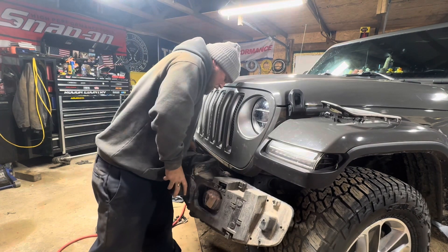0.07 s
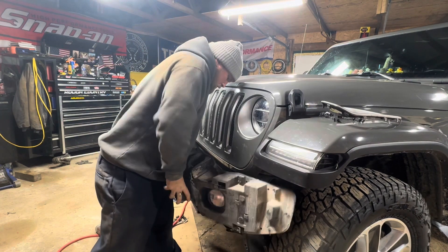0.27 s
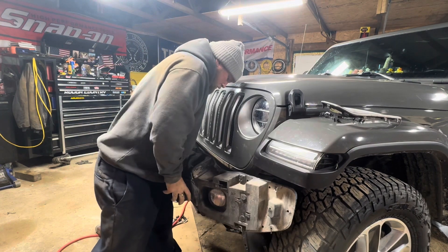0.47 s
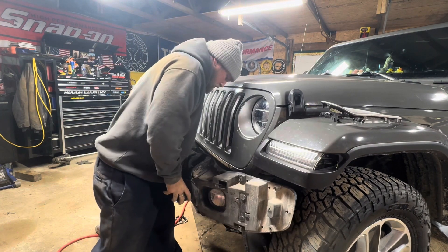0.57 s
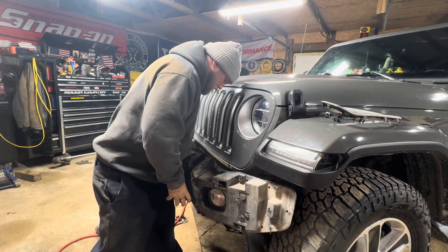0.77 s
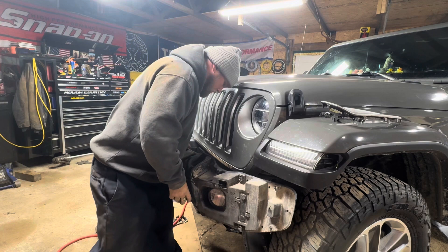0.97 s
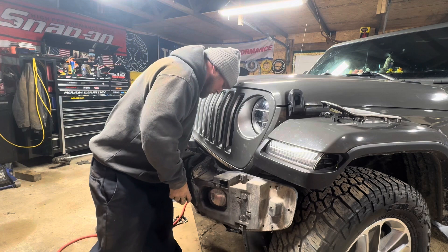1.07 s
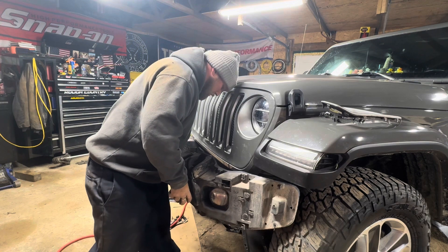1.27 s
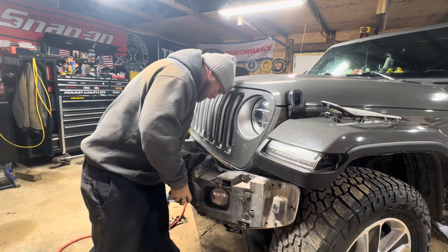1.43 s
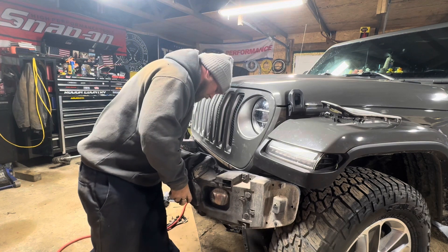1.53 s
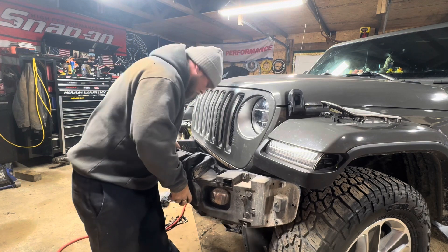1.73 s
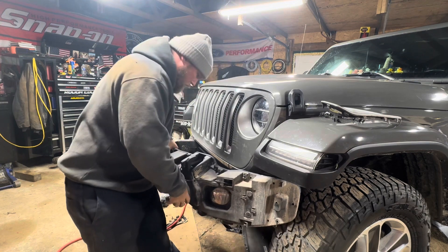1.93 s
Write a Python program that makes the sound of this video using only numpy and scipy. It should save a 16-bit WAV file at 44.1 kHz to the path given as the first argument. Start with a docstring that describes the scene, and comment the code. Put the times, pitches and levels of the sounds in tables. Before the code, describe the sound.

A loose metal and plastic vehicle bumper grinds softly over low rumble, then a tiny sharp squeak at 0.2 s leads into a loud, crunching cluster of bangs until 0.33. A dull knock and low groan come at 0.55, bright plastic snaps and crackles at 0.73-0.9, faint scrapes and taps around 1.0-1.15. After a lull, hissing hollow slide and knocks burst at 1.67 and 1.74, ringing through the garage.

```python
"""In a garage, a loose steel and plastic bumper is tugged by hand while the car's frame rumbles.
It grinds, groans and squeaks, then bangs against its mounts; a plastic part snaps and crackles close by.
A hissing slide with a hollow tone and two more bursts of knocks follow, and the garage rings on.
Blows and slips drive a ringing shell, friction tones are unsteady sines, snaps and hisses are shaped noise."""
import sys
import numpy as np
from scipy import signal
from scipy.fft import rfft, irfft
from scipy.io import wavfile

SR = 44100
rng = np.random.default_rng(int(sys.argv[2]) if len(sys.argv) > 2 else 0)


def master_out(mix):
    """Clip the mix to full scale and print it as 16-bit PCM to the path in sys.argv[1]."""
    frames = np.transpose(np.atleast_2d(mix))
    ceiling = np.clip(frames, -1, 1)
    pcm = np.round(ceiling * 32767).astype(np.int16)
    wavfile.write(sys.argv[1], SR, pcm)


N = 88200
T = np.arange(N) / SR


def from_db(db):
    """Decibels to gain."""
    return 10 ** (np.asarray(db) / 20)


def unit(x):
    """Scale to energy 1."""
    return x / np.sqrt(np.sum(x ** 2) + 1e-20)


def rms_one(x):
    """Scale to rms 1."""
    return unit(x) * np.sqrt(len(x))


def at_hz(points, hz):
    """Read a table on a log-frequency axis."""
    f, v = np.transpose(points)
    return np.interp(np.log(np.maximum(hz, 1)), np.log(f), v)


def in_time(rows):
    """Read the columns of a curve at every sample."""
    s, *columns = np.transpose(rows)
    return [np.interp(T, s, column) for column in columns]


def swell(s, rise, fall):
    """A bell-shaped stroke that peaks at a time, with its own rise and fall in seconds."""
    width = np.where(T < s, rise, fall)
    return np.exp(-((T - s) / width) ** 2)


def add(out, s, x):
    """Mix a sound in at a time."""
    start = int(max(s, 0) * SR)
    out[start:start + len(x)] += x[:N - start]


def through(x, response):
    """Play a sound through an impulse response."""
    return signal.fftconvolve(x, response)[:N]


def cut(x, hz, kind, order=2):
    """Butterworth filter."""
    corners = np.clip(hz, 10, .45 * SR)
    sos = signal.butter(order, corners, kind, fs=SR, output="sos")
    return signal.sosfilt(sos, x + 1e-18)


def colour(x, spectrum):
    """Causal (minimum-phase) filter that follows a spectrum."""
    gain = from_db(at_hz(spectrum, np.fft.rfftfreq(N, 1 / SR)))
    cepstrum = irfft(np.log(gain))
    cepstrum[1:N // 2] *= 2
    cepstrum[N // 2 + 1:] = 0
    return through(x, irfft(np.exp(rfft(cepstrum))))


def dying_noise(t60s):
    """Countless modes: a flat response whose bands die at their own rates; energy 1."""
    white = rfft(rng.standard_normal(N))
    hz = np.fft.rfftfreq(N, 1 / SR)
    centres = np.geomspace(80, 16000, 16)
    out = 0
    for centre, pick in zip(centres, np.eye(len(centres))):
        share = np.interp(hz, centres, pick)
        decay = from_db(-60 * T / at_hz(t60s, centre))
        out = out + np.sqrt(share.mean()) * unit(irfft(white * share) * decay)
    return unit(out)


def grains(per_s, spread_db):
    """Random small contacts of uneven size, at an average rate; rms 1."""
    unevenness = np.minimum(rng.exponential(1, N), 4)
    sizes = from_db(spread_db * unevenness) * rng.choice([-1, 1], N)
    return rms_one(sizes * (rng.random(N) < per_s / SR))


def stick_slip(hz, jitter, jitter_hz):
    """Phase of a friction tone whose pitch wavers at random by a share of itself."""
    wobble = rms_one(cut(rng.standard_normal(N), jitter_hz, "low"))
    return 2 * np.pi * np.cumsum(hz * (1 + jitter * wobble)) / SR


# rumble of the frame: (time [s], level [dB])
RUMBLE = [(0, -50.5), (.13, -49), (.28, -42), (.34, -43.5), (.6, -41.5), (.85, -57.5), (1.16, -51.5),
          (1.26, -46), (1.32, -59), (1.62, -67), (1.8, -54)]
# tone of the rumble: (frequency [Hz], relative level [dB])
RUMBLE_COLOUR = [(25, -28), (52, -8), (80, 4), (105, -15), (140, 1.5), (200, -8), (600, -43.5)]
# tone of the still air: (frequency [Hz], relative level [dB])
AIR_COLOUR = [(30, -15.5), (80, -2.5), (700, -14.5), (5000, -26), (11500, -17.5), (15000, -29)]
AIR_DB = -63.5


def background():
    """Noise with a low colour rumbles as the frame, over a steady noise for the still air of the garage."""
    rumble = rms_one(colour(rng.standard_normal(N), RUMBLE_COLOUR))
    air = rms_one(colour(rng.standard_normal(N), AIR_COLOUR))
    return from_db(in_time(RUMBLE)[0]) * rumble + from_db(AIR_DB) * air


# how long the garage rings: (frequency [Hz], time to die by 60 dB [s])
GARAGE_T60 = [(300, 0.66), (3000, 0.47), (14000, 0.39)]
FIRST_ECHO_S = .006


def garage():
    """Response of the room: diffuse echoes that build up after the first reflection."""
    build_up = np.clip(T / FIRST_ECHO_S - 1, 0, 1)
    return unit(dying_noise(GARAGE_T60) * build_up)


# grinding on the mounts: (time [s], relative level [dB])
GRIND = [(0, -44), (.075, -47.5), (.11, -40.5), (.18, -43), (.30, -31.5), (.42, -38), (.53, -37),
         (.68, -59), (.96, -58.5), (.988, -44.5), (1.08, -47.5), (1.12, -50.5), (1.15, -42), (1.18, -70)]
GRIND_PER_S, GRIND_SPREAD_DB = 1600, 5.5  # slips a second, unevenness
GRIND_LOW_HZ, GRIND_TOP_HZ, GRIND_DB = 213, 2660, 10.5


def grinding():
    """Force of the bumper dragging over its mounts: dense small slips."""
    slips = cut(grains(GRIND_PER_S, GRIND_SPREAD_DB), GRIND_TOP_HZ, "low")
    slips = cut(slips, GRIND_LOW_HZ, "high")
    return from_db(in_time(GRIND)[0] + GRIND_DB) * slips


# the bumper's strongest modes: (frequency [Hz], relative level [dB])
BUMPER_MODES = [(298, -1.5), (379, 5), (490, 6.5), (576, -3), (617, -2.5), (645, 3), (714, -9), (1288, 4),
                (1372, 3.5), (1543, -1.5), (2348, -4), (2610, 0)]
# tone of its crowd of lesser modes: (frequency [Hz], relative level [dB])
SHELL = [(60, -15), (160, 1.5), (330, 4.5), (650, 1), (950, -3.5), (1400, -0.5), (2000, -5), (2600, -5),
         (3500, -7), (4500, -10.5), (7500, -16.5), (10800, -17), (13000, -24)]
# how long that crowd rings: (frequency [Hz], time to die by 60 dB [s])
SHELL_T60 = [(200, 0.094), (14000, 0.052)]
MODE_T60_S, MODES_DB = .35, -16
CRACK_DB = -1.5   # instant crack at the contact
GARAGE_DB = -4    # echoes of the heavy sounds


def bumper(force, echoes):
    """The shell cracks and rings briefly, the garage carries it on; the strongest modes stand out."""
    shell = dying_noise(SHELL_T60) + from_db(GARAGE_DB) * echoes
    shell[0] += from_db(CRACK_DB)
    modes = sum(rng.choice([-1, 1]) * from_db(db) * np.sin(2 * np.pi * hz * T) for hz, db in BUMPER_MODES)
    ringing = unit(modes * np.exp(-np.log(1000) * T / MODE_T60_S))
    return through(force, colour(shell, SHELL) + from_db(MODES_DB) * ringing)


# groans and squeals under strain: (peak time [s], half length [s], pitch [Hz], level [dB])
GROANS = [(.01, 0.012, 370.7, -36.5), (0.556, 0.09, 373.4, -39), (0.99, 0.02, 371.6, -43),
          (0.999, 0.011, 1329, -41), (1.1, 0.02, 3750, -58.5), (1.128, 0.0094, 374, -44)]
GROAN_JITTER_HZ = 12


def groans():
    """Stick-slip under strain sings unsteady tones: mostly one low pitch, at times a higher one."""
    out = 0
    for s, half, hz, db in GROANS:
        tone = rms_one(np.sin(stick_slip(hz, GROAN_JITTER_HZ / hz, 31)))
        out = out + from_db(db) * swell(s, half, half) * tone
    return out


# sliding plastic and cloth: (peak time [s], rise [s], fall [s], hiss level [dB])
SLIDES = [(.13, 0.048, 0.065, -50.5), (0.802, 0.15, 0.052, -44), (1.02, 0.15, 0.19, -52.5),
          (1.669, 0.039, 0.041, -35.5), (1.756, 0.016, 0.032, -41), (1.93, 0.089, 0.055, -48)]
# tone of the hiss: (frequency [Hz], relative level [dB])
SLIDE_COLOUR = [(400, -13), (1500, 3.5), (7500, -2), (11000, -3.5), (12500, -6.5), (16000, -11.5)]
SLIDE_PER_S, SLIDE_SPREAD_DB = 6300, 3  # contacts a second, unevenness
HOLLOW_HZ, HOLLOW_WIDTH_HZ, HOLLOW_DB = 1160, 390, -38.5
HOLLOW_STROKE = (1.66, 0.027, 0.038)    # (peak time [s], rise [s], fall [s])


def slides():
    """Strokes of fine friction swell and fade; a hollow resonance sounds with the loudest slide."""
    hiss = rms_one(colour(grains(SLIDE_PER_S, SLIDE_SPREAD_DB), SLIDE_COLOUR))
    band = [HOLLOW_HZ - HOLLOW_WIDTH_HZ / 2, HOLLOW_HZ + HOLLOW_WIDTH_HZ / 2]
    hollow = rms_one(cut(grains(SLIDE_PER_S, SLIDE_SPREAD_DB), band, "band"))
    strokes = sum(from_db(db) * swell(s, rise, fall) for s, rise, fall, db in SLIDES)
    return strokes * hiss + from_db(HOLLOW_DB) * swell(*HOLLOW_STROKE) * hollow


# stick-slip squeak leading into the bang: (time [s], pitch [Hz], level [dB])
SQUEAK = [(.188, 2513, -45.5), (.197, 2543, -21.5), (.202, 2618, -24.5), (.210, 2602, -8),
          (.217, 2465, -10), (.226, 2200, -35.5)]
SQUEAK_JITTER = 0.045  # rms share of the pitch
SQUEAK_OCTAVE_DB, SQUEAK_RASP_DB = -16.5, -6


def squeak():
    """A short stick-slip squeal with its octave and a rasp of the shell."""
    hz, db = in_time(SQUEAK)
    phase = stick_slip(hz, SQUEAK_JITTER, 330)
    tone = rms_one(np.sin(phase) + from_db(SQUEAK_OCTAVE_DB) * np.sin(2 * phase))
    rasp = rms_one(cut(colour(grains(GRIND_PER_S, 1.6), SHELL), [900, 4000], "band"))
    sounding = (T > SQUEAK[0][0]) & (T < SQUEAK[-1][0])
    return sounding * from_db(db) * (tone + from_db(SQUEAK_RASP_DB) * rasp)


CHATTER_S, REBOUND = .0025, .78  # average delay in all, share kept at each rebound


def chatter(count=3):
    """One contact scattered into a dying run of rebounds by all-pass delays, even in colour."""
    force = np.eye(1, N // 16)[0]  # a single click
    lags = CHATTER_S * SR * rng.uniform(.4, 1.6, count) / count
    for lag in lags.astype(int):
        taps = np.r_[REBOUND, np.zeros(lag), 1]
        force = signal.lfilter(taps, taps[::-1], force)
    return force


# blows on the mounts: (time [s], relative level [dB], hardness as upper corner [Hz], lower corner [Hz])
KNOCKS = [(.2005, -6, 2550, 1160), (.2165, -2.5, 10900, 680), (.223, 2.5, 1880, 430),
          (0.2423, -2.5, 12900, 796), (.257, -1, 1780, 427), (.281, -11, 2520, 560), (.294, -14, 1600, 150),
          (.329, -14.5, 2450, 220), (.551, -18.5, 514, 143), (1.033, -32, 4090, 605),
          (1.127, -26, 530, 300), (1.135, -30, 3900, 730), (1.6707, -9, 3680, 1810),
          (1.673, -5.5, 291, 183), (1.6771, -8.5, 3660, 387), (1.684, -17.5, 3350, 460),
          (1.7345, -10.5, 1700, 420), (1.745, -20, 1850, 340), (1.754, -15.5, 1820, 157)]
BUMPER_DB = 26.5


def knocks(rows):
    """Force of the blows: a brief chatter each, duller when the contact is soft."""
    out = np.zeros(N)
    for s, db, top_hz, low_hz in rows:
        blow = cut(chatter(), top_hz, "low", order=8)
        add(out, s, from_db(db + BUMPER_DB) * cut(blow, low_hz, "high"))
    return out


CRUNCH_STROKE = (0.251, 0.032, 0.043)  # (peak time [s], rise [s], fall [s])
CRUNCH_PER_S, CRUNCH_LOW_HZ, CRUNCH_DB = 4000, 2200, -11


def crunch():
    """Force of the hard edges scraping past each other during the bang: dense bright slips."""
    slips = cut(grains(CRUNCH_PER_S, GRIND_SPREAD_DB), CRUNCH_LOW_HZ, "high")
    return from_db(CRUNCH_DB) * swell(*CRUNCH_STROKE) * slips


# plastic snaps: (time [s], relative level [dB], lower corner [Hz])
SNAPS = [(0.7335, 1.5, 1330), (0.7592, -7.5, 3800), (0.782, -4, 3640), (0.8084, 1.5, 1300),
         (0.8174, -6.5, 2470), (0.827, -5.5, 1790), (0.843, -8, 4000), (.892, -19, 3480)]
# tone of the plastic: (frequency [Hz], relative level [dB])
SNAP_COLOUR = [(900, -14), (1600, 6), (3000, -4.5), (5600, 4), (7000, -3.5), (16000, -4)]
SNAP_T60_S, SNAP_DB = .011, -5
SNAP_TICK = .6  # instant tick on top of a noise burst of energy 1


def snaps():
    """Sharp plastic clicks, each a tick and a fast-dying noise; the small ones are mostly thinner."""
    out, t = np.zeros(N), T[:N // 32]
    for s, db, low_hz in SNAPS:
        click = unit(rng.standard_normal(len(t)) * np.exp(-np.log(1000) * t / SNAP_T60_S))
        click[0] += SNAP_TICK
        add(out, s, from_db(db + SNAP_DB) * cut(click, low_hz, "high", order=3))
    return colour(out, SNAP_COLOUR)


CRACKLE_PEAK_S, CRACKLE_RISE_S, CRACKLE_FALL_S = 0.749, 0.027, 0.14
CRACKLE_PER_S, CRACKLE_SPREAD_DB, CRACKLE_DB = 350, 5, -42.5


def crackle():
    """The strained plastic ticks at random, swelling quickly and then ever more faintly as it relaxes."""
    pace = np.where(T < CRACKLE_PEAK_S, CRACKLE_RISE_S, CRACKLE_FALL_S)
    strain = np.exp(-abs(T - CRACKLE_PEAK_S) / pace)
    tick = rng.standard_normal(N) * 1000. ** (-2 * T / SNAP_T60_S)  # dies twice as fast as a snap
    ticks = through(grains(CRACKLE_PER_S, CRACKLE_SPREAD_DB), tick)
    return from_db(CRACKLE_DB) * strain * rms_one(colour(cut(ticks, [1800, 11000], "band"), SNAP_COLOUR))


NEAR_GARAGE_DB = -11.5  # echoes of the light sounds


def scene(count=3):
    """Blows land on several spots of the bumper in turn, scraping on another; light friction lies on top."""
    blows = sum(bumper(knocks(KNOCKS[spot::count]), garage()) for spot in range(count))
    heavy = blows + bumper(grinding() + crunch(), garage())
    light = squeak() + groans() + snaps() + crackle() + slides()
    light_echoes = from_db(NEAR_GARAGE_DB) * through(light, garage())
    return (heavy + light + light_echoes + background())[None]


OVERLOAD, CUTOFF_HZ = .95, 16100


def record(dry):
    """The loudest peaks are rounded and the top is cut."""
    rounded = OVERLOAD * np.tanh(dry / OVERLOAD)
    return signal.sosfilt(signal.ellip(12, .1, 90, CUTOFF_HZ, fs=SR, output="sos"), rounded)


dry = scene()
out = record(dry)
master_out(out)
```